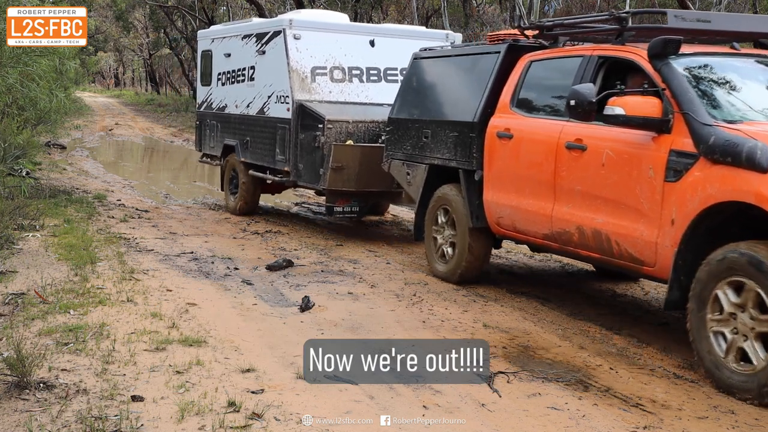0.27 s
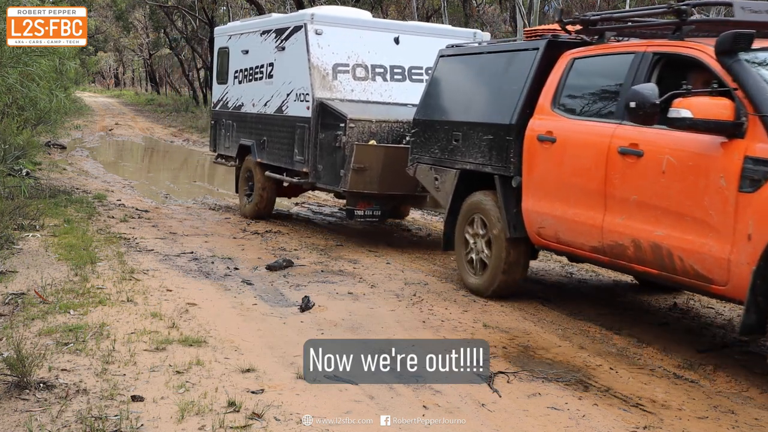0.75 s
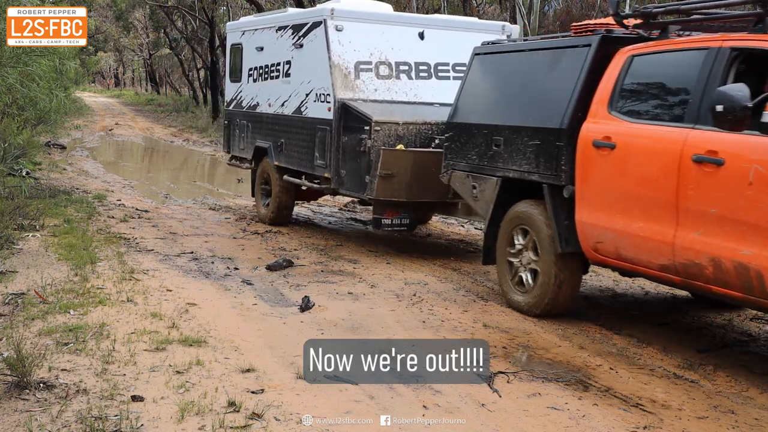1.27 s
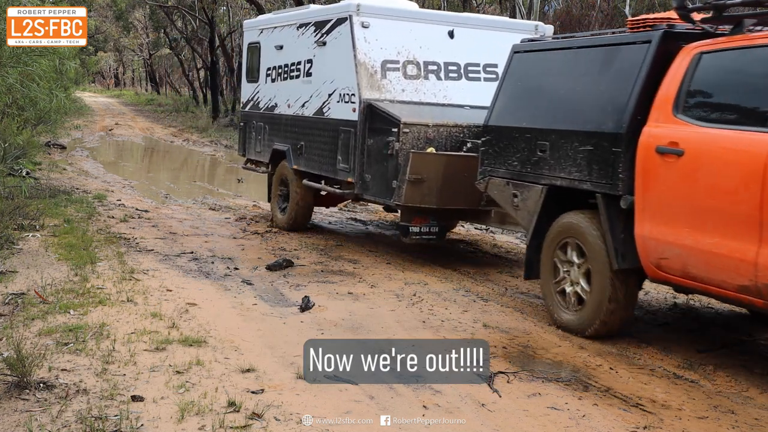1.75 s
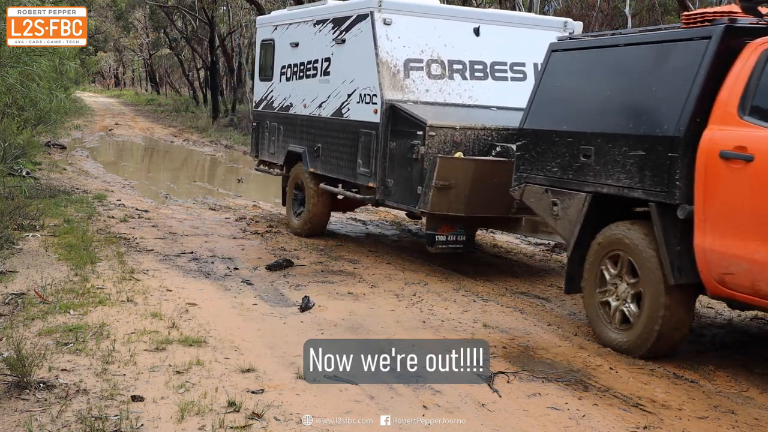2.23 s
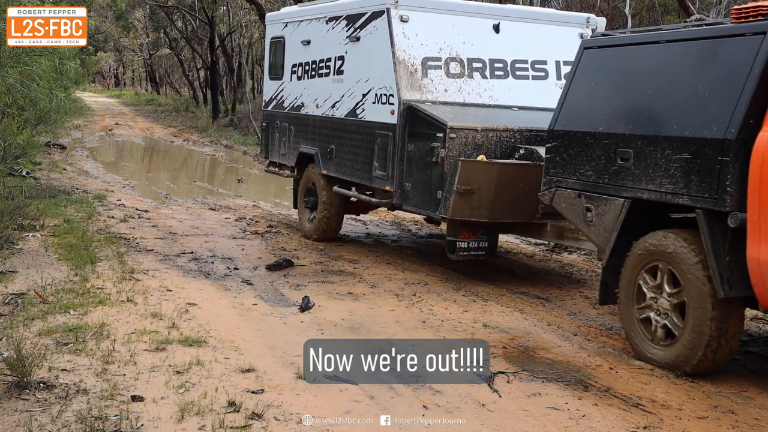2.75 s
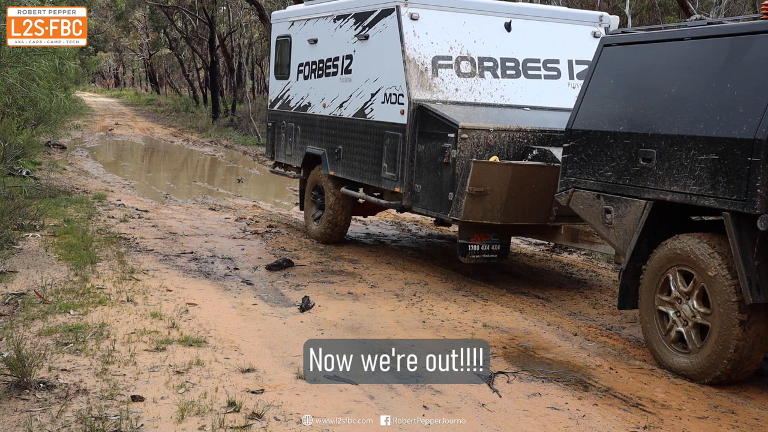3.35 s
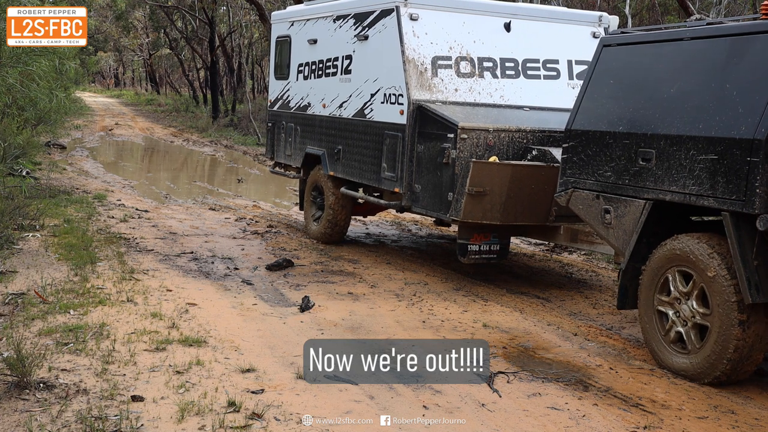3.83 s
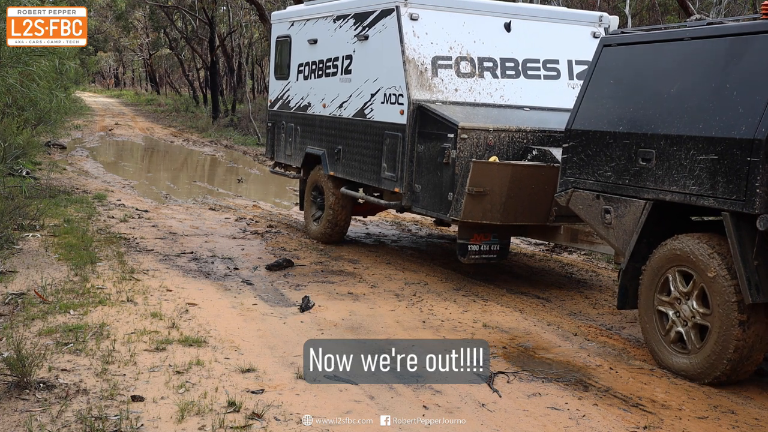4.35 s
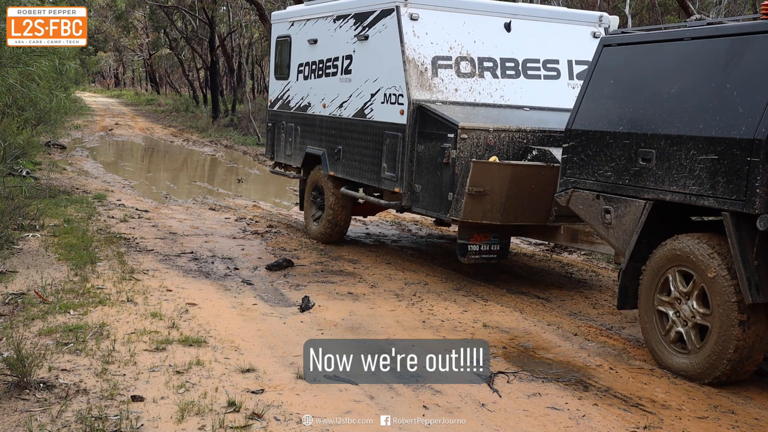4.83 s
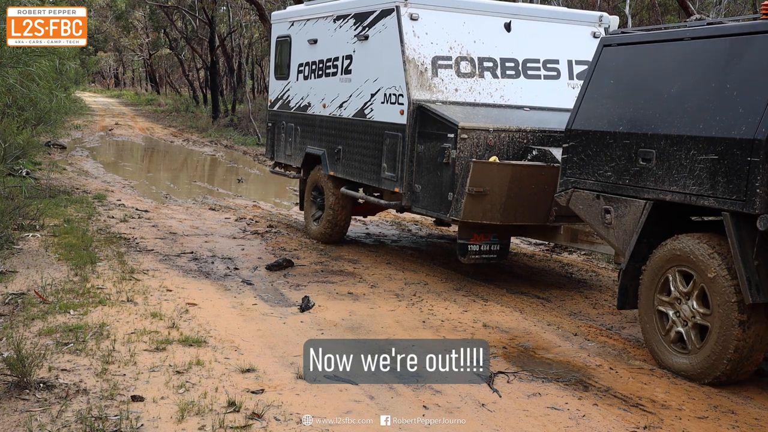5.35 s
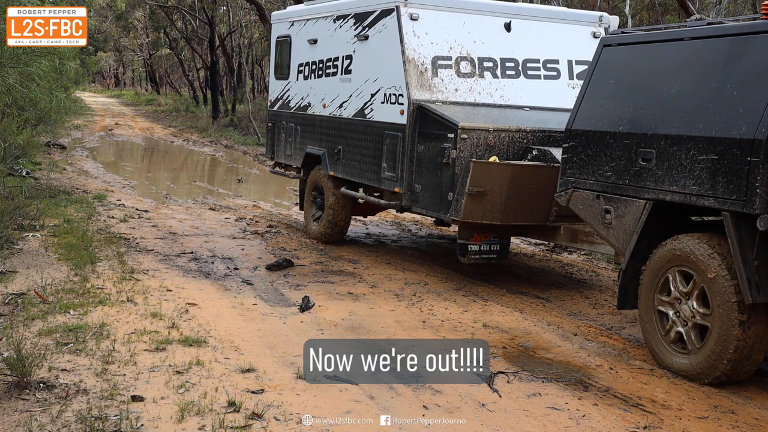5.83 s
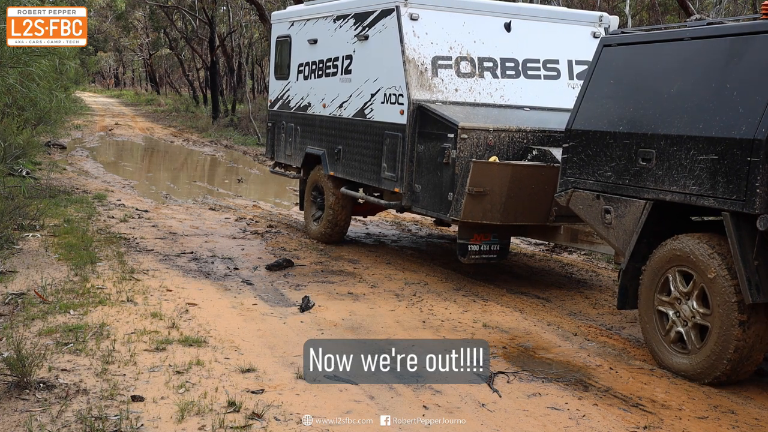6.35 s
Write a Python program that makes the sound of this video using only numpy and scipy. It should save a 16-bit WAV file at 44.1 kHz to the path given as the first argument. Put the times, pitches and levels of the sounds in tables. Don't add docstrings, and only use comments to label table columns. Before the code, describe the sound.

Outdoors, very near a small stereo microphone, a heavy diesel engine hums and roars steadily, then slows within two seconds to a lumpy, metallic clatter. Airy tones from the bodywork shift as the vehicle passes, and wet mud clicks lightly off the wheels. The engine holds a rough idle, lifts briefly, and drops back to a quieter, even chug, with the brighter sound leaning right.

```python
import sys
import numpy as np
from scipy import signal
from scipy.fft import rfft, irfft, next_fast_len
from scipy.io import wavfile
from scipy.ndimage import uniform_filter1d

SR = 44100
rng = np.random.default_rng(int(sys.argv[2]) if len(sys.argv) > 2 else 0)


def master(y):
    cut = np.clip(np.atleast_2d(y).T, -1, 1)
    pcm = np.round(cut * 32767)
    wavfile.write(sys.argv[1], SR, pcm.astype(np.int16))


def decibels_to_gain(level_db):
    exponent = np.asarray(level_db, float) / 20
    return 10 ** exponent


N = 290609
T = np.arange(N) / SR
HZ = np.maximum(np.fft.rfftfreq(next_fast_len(N + 4096), 1 / SR), 1)
CYLINDERS = 5
ROLL_S, STOP_S = 1.77, 3.66
UNLOAD_S, UNLOAD_SPAN_S = 4.65, .3

# t/s, firing rate f/Hz
FIRING_RATE = [(0, 47.6), (0.6, 48.09), (0.86, 46.04), (1.12, 44.6), (1.26, 41.93), (1.5, 34.68),
               (1.76, 36.45), (2.2, 34.93), (2.52, 34.72), (2.7, 33.52), (2.84, 34.27), (4.4, 34.15),
               (4.68, 38.05), (4.88, 36.38), (5.36, 34.96), (6, 34.28), (6.59, 34.11)]
# t/s, level/dB
ENGINE_LOAD = [(0, 2.8), (1.15, 1.9), (1.45, -3.8), (1.7, -0.2), (2.3, -0.5), (2.7, -2.9), (4.5, -0.8),
               (4.75, -3.5), (5.1, -4), (5.5, -5.5), (6.59, -7.5)]

# f/Hz, level/dB
EXHAUST_PIPE = [(34, -37.5), (41, -32.5), (48, -24.5), (69, -21.5), (85, -29.5), (135, -25), (165, -27),
                (190, -31.5)]
ORDER_FOLLOWS_LOAD = [1.55, 1.24, 0.98, 1.02]
# f/Hz, width/Hz, level/dB
BODY_HOLLOWS = [(189.4, 30, -34), (244.7, 23.5, -33), (290.6, 10.2, -32), (384, 18, -41)]

# crank position/firings, then level/dB into knock groups 1-4
CYLINDER_KNOCKS = [(.76, -10, 2, -1, -4), (1.76, 0, -2, -18, -4), (2.78, -2, -12, 0, -3),
                   (3.78, -8, -7, -1, -5), (4.73, -1, -18, -18, -3)]
# knock group, f/Hz, lag/firings, level/dB
KNOCK_RINGS = [(1, 2170, -.03, -1), (1, 2060, -.01, -4), (2, 1640, .05, 3), (3, 1495, .13, 1),
               (4, 1930, .04, -4), (4, 1815, .2, -8), (4, 2710, .06, 0), (4, 3080, .1, 0)]
# crank position/firings, f/Hz, level/dB
VALVE_AND_MOUNT_TAPS = [(.58, 190, 0), (.5, 150, -8), (1.6, 165, -5), (3.2, 185, -3), (4.45, 165, -1),
                        (2.4, 192, -9), (.9, 250, -2), (2.8, 285, -2), (4.7, 245, -1), (4.85, 378, 0),
                        (1.8, 378, -5), (3.6, 350, -4), (.2, 560, 0), (.95, 560, -4), (1.8, 580, -3),
                        (2.85, 575, -3), (3.72, 560, -5), (4.2, 625, -1), (4.8, 610, 0), (1.78, 1150, -4),
                        (2.8, 1040, -2), (3.2, 1040, 0), (4.72, 1180, -5), (.78, 1180, -4), (4.98, 1293, 0),
                        (.43, 1293, -5), (1.68, 1293, -5), (3.03, 1293, -5), (4.0, 1293, -4),
                        (2.26, 1495, -2)]
# f/Hz, time to fall 60 dB/s
METAL_T60 = [(160, .09), (190, .16), (250, .08), (380, .13), (575, .09), (1040, .11), (1290, .13),
             (1640, .08), (2170, .042), (2900, .015)]
# f/Hz, level/dB
METAL_LEVEL = [(170, 7), (250, 3), (380, 7), (575, 5), (1040, 5), (1290, 4), (1500, 4), (1640, 3),
               (2170, 7.5), (2900, 1)]
METAL_BORDERS = [220, 800, 1200, 1400, 1800]

# f/Hz, level/dB per Hz
LOW_ROAR_SPECTRUM = [(30, -42), (80, -26), (125, -14), (190, -9), (300, -14), (378, -10), (460, -16),
                     (580, -12), (800, -19), (1500, -45), (4000, -110)]
# f/Hz, level/dB per Hz
BRIGHT_ROAR_SPECTRUM = [(400, -25), (750, -5), (950, -9), (1300, -6), (1550, -5), (1800, -7), (2150, -7),
                        (2450, -11), (3100, -12), (4100, -21), (6200, -33), (8300, -41), (9300, -47),
                        (15000, -62)]

# middle t/s, length/s, f/Hz, width/Hz, level/dB
BODY_GLINTS = [(0.39, 0.61, 1800, 110, -37), (0.95, 0.8, 1498, 120, -32.5), (1.89, 0.39, 1840, 77, -36),
               (2, 0.74, 1220, 240, -33), (2.52, 0.96, 1079, 91, -34), (1.8, 0.091, 270, 47, -37),
               (2.4, 1.1, 320, 280, -30), (4.36, .3, 440, 30, -37), (0.97, 0.35, 390, 49, -32),
               (1.0, 0.79, 2200, 145, -44), (3.6, 3.1, 1510, 35, -39), (4.8, 5.2, 4780, 600, -55.5),
               (2.25, 0.36, 560, 26, -33.5), (4.8, 0.98, 185, 37, -30), (5.8, 1.8, 1930, 220, -44),
               (3.5, 2.3, 950, 27, -43), (5.75, 1.7, 1295, 29, -42.5), (5.9, 1.6, 1045, 26, -46.5),
               (.29, .012, 4600, 900, -42)]
# t/s, peak level/dB
BRIGHT_TICKS = [(0.7894, -52), (0.8994, -52), (0.9994, -52.5), (1.1697, -48.5), (1.283, -53), (1.4097, -50),
                (1.5694, -49.5), (1.8253, -50.5), (2.0594, -52), (2.188, -48), (2.319, -48), (2.4294, -52),
                (2.5284, -49), (2.5975, -51), (2.7394, -51), (2.8534, -49), (2.9607, -49), (3.0879, -51),
                (3.2231, -48.5), (3.5079, -57), (3.9644, -53.5), (4.2233, -46), (4.2906, -50), (4.6219, -63),
                (4.8723, -50), (4.9594, -55.5), (5.1472, -52), (5.4944, -53), (6.0097, -57), (6.2482, -53.5)]

# start level/dB, then gain/dB by the stop, at idle speed, when slack.
BLOCK_LAYER = (-34.5, -0.3, 14.5, -3.5)
LOW_LAYER = (-25, 0.9, -4.4, -2)
BRIGHT_LAYER = (-36.5, -5, -0.76, -0.04)
SIDE_LAYER = (-3, 2.5, 1.94, -0.2)
PANEL_LAYERS = [
    (-37, 2.7, 3.1, -3),
    (-45, 11, 5.1, -9.5),
    (-37.5, -3, 2.9, 7.5),
    (-39.5, 4, 2.95, -7.5),
    (-40, 4.5, 4.1, -0.8),
]

# f/Hz, side over mid level/dB, side phase lead/rad, direct share of side
MIC_PORTS = [(40, -50, -.7, .9), (100, -33, -.7, .9), (200, -25, -.7, .8), (350, -19, -.3, .7),
             (700, -11, 0, .8), (1050, -4, .25, .9), (2000, 1.5, .5, .94), (3400, 4, .55, .85),
             (5200, 6, .8, .75), (6800, 11, .8, .6), (14000, 13, .8, .5)]


def exhaust(crank, per_s):
    null_hz, pipe_return = 77.1, 0.69
    load_db, = in_time(ENGINE_LOAD)
    idle = (48 - per_s) / 14
    hollow_db = -6 * ramp(ROLL_S, STOP_S - ROLL_S) + 0.65 * load_db
    out = 0
    for k in range(1, 12):
        hz = k * per_s
        if k <= len(ORDER_FOLLOWS_LOAD):
            pipe = np.abs(1 - pipe_return * np.exp(-2j * np.pi * hz / null_hz))
            gain = pipe * decibels_to_gain(at_hz(EXHAUST_PIPE, hz) + ORDER_FOLLOWS_LOAD[k - 1] * load_db)
        else:
            gain = 0
            for top_hz, wide_hz, db in BODY_HOLLOWS:
                gain = gain + decibels_to_gain(db + hollow_db) / (1 + (2 * (hz - top_hz) / wide_hz) ** 2)
        lag = 1.75 * k - 4.75 + idle * (1.1, .3, 2.9, 3.1, 4.4, 4)[min(k, 6) - 1]
        waver = decibels_to_gain((.9 + 2 * (k > 4)) * drift(5))
        out = out + gain * waver * np.sqrt(2) * np.cos(2 * np.pi * k * crank + lag)
    return out


def knocks(crank, per_s, spread_db, jitter_s, rattle):
    blows = list(VALVE_AND_MOUNT_TAPS)
    for row in CYLINDER_KNOCKS:
        for group, hz, lag, db in KNOCK_RINGS:
            blows.append((row[0] + lag, hz, row[group] + db))
    layers = [BLOCK_LAYER] + list(PANEL_LAYERS)
    parts = np.zeros((len(layers), N))
    cycles = np.arange(int(crank[-1] / CYLINDERS) + 1)
    tail = np.arange(int(.06 * SR))
    for position, hz, strength_db in blows:
        chance = rng.standard_normal((len(cycles), 2))
        at = np.interp(CYLINDERS * cycles + position, crank, T, right=T[-1] + .5)
        at = at + jitter_s * chance[:, 0]
        start = np.abs(at * SR).astype(int)
        clicks = np.zeros(N + SR)
        clicks[start] = decibels_to_gain(at_hz(METAL_LEVEL, hz) + strength_db + spread_db * chance[:, 1])
        shiver = rng.standard_normal(len(tail)) + .45 * rng.standard_normal((len(cycles), len(tail)))
        shiver = shiver * np.exp(-tail / (.018 * SR))
        start = start[:, None]
        clicks[start + tail] += rattle * (hz > 900) * clicks[start] * shiver
        parts[np.searchsorted(METAL_BORDERS, hz)] += ring(clicks[:N], hz, at_hz(METAL_T60, hz))
    struck = sum(decibels_to_gain(layer_db(layer, per_s)) * part for layer, part in zip(layers, parts))
    return signal.sosfilt(signal.butter(2, 4500, fs=SR, output="sos"), struck)


def roar(spectrum, crank, puff_db, patchy_db, locked):
    since_firing = (crank + .25) % 1
    puff = uniform_filter1d(np.exp(-since_firing / .3), size=40)
    gate = decibels_to_gain(puff_db * puff + patchy_db * drift(20))
    tap_count = 1200
    place, size = rng.uniform(0, CYLINDERS, tap_count), rng.standard_normal(tap_count)
    turns = CYLINDERS * np.arange(int(crank[-1] / CYLINDERS) + 1)[:, None] + place
    at = np.interp(turns, crank, np.arange(N), right=N).astype(int).ravel()
    taps = np.bincount(at, np.tile(size, len(turns)), N + 1)[:N]
    drive = np.sqrt(locked) * rms_one(taps) + np.sqrt(1 - locked) * rng.standard_normal(N)
    return gate * rms_one(through(drive, decibels_to_gain(at_hz(spectrum, HZ))))


def glints():
    out = 0
    for s, length_s, hz, wide_hz, db in BODY_GLINTS:
        sung = through(rng.standard_normal(N), 1 / (1 + (2 * (HZ - hz) / wide_hz) ** 2))
        swell = np.exp(-(2 * (T - s) / length_s) ** 4)
        out = out + decibels_to_gain(db) * swell * rms_one(sung)
    return out


def bright_ticks():
    clicks = np.zeros(N)
    for s, peak_db in BRIGHT_TICKS:
        clicks[round(s * SR)] = decibels_to_gain(peak_db)
    fade = signal.lfilter([1], [1, -np.exp(-1 / (0.0039 * SR))], clicks + 1e-18)
    bright = signal.butter(1, [3000, 14000], "band", fs=SR, output="sos")
    return signal.sosfilt(bright, fade * rng.standard_normal(N))


def layer_db(law, per_s):
    idle = np.clip((48 - per_s) / 13, 0, 1)
    slack = ramp(UNLOAD_S - UNLOAD_SPAN_S / 2, UNLOAD_SPAN_S)
    return law[0] + law[1] * ramp(ROLL_S, STOP_S - ROLL_S) + law[2] * idle + law[3] * slack


def ring(clicks, hz, t60):
    r, w = decibels_to_gain(-60 / (t60 * SR)), 2 * np.pi * hz / SR
    return signal.lfilter([0, np.sin(w)], [1, -2 * r * np.cos(w), r * r], clicks + 1e-18)


def drift(rate):
    r = np.exp(-80 * np.pi * rate / SR)
    slow = signal.lfilter([1], [1, -2 * r, r * r], rng.standard_normal(N // 40 + 2002))[2000:]
    return np.interp(np.arange(N) / 40, np.arange(len(slow)), rms_one(slow))


def ramp(start, span):
    return .5 - .5 * np.cos(np.pi * np.clip((T - start) / span, 0, 1))


def rms_one(x):
    return x / np.sqrt(np.mean(x ** 2) + 1e-20)


def in_time(rows):
    s, *columns = np.transpose(rows)
    return [np.interp(T, s, c) for c in columns]


def at_hz(points, hz, axis=1):
    points = np.array(points)
    return np.interp(np.log(hz), np.log(points[:, 0]), points[:, axis])


def through(x, response):
    size = 2 * len(HZ) - 2
    return irfft(rfft(x, size) * response, size)[:N]


def scene():
    per_s, = in_time(FIRING_RATE)
    crank = np.cumsum(per_s) / SR
    truck = exhaust(crank, per_s)
    truck = truck + knocks(crank, per_s, spread_db=.8, jitter_s=.00015, rattle=.017)
    low = roar(LOW_ROAR_SPECTRUM, crank, puff_db=1.5, patchy_db=.7, locked=.55)
    truck = truck + decibels_to_gain(layer_db(LOW_LAYER, per_s) - 1.5) * low
    bright = roar(BRIGHT_ROAR_SPECTRUM, crank, puff_db=5.0, patchy_db=0.77, locked=.45)
    truck = truck + decibels_to_gain(layer_db(BRIGHT_LAYER, per_s) + 7.5) * bright
    truck = truck + glints()
    ticks = bright_ticks()

    direct = np.clip(at_hz(MIC_PORTS, HZ, axis=3), 0, 1)
    ports = decibels_to_gain(at_hz(MIC_PORTS, HZ))
    straight = np.exp(1j * at_hz(MIC_PORTS, HZ, axis=2))
    scattered = np.sqrt(1 - direct ** 2) * np.exp(-2j * np.pi * HZ * .037)
    side = through(truck, ports * (direct * straight + scattered))
    side = side + through(ticks, .35 * ports * straight)
    side = decibels_to_gain(layer_db(SIDE_LAYER, per_s)) * side
    mid = truck + ticks
    return np.array([mid - side, mid + side])


def top_cut(x):
    return signal.sosfilt(signal.butter(12, 15500, fs=SR, output="sos"), x)


def record(dry):
    mic_top_hz = 14300
    mix = signal.sosfilt(signal.butter(8, mic_top_hz, fs=SR, output="sos"), dry)
    return top_cut(mix)


dry = scene()
out = record(dry)
master(out)
```